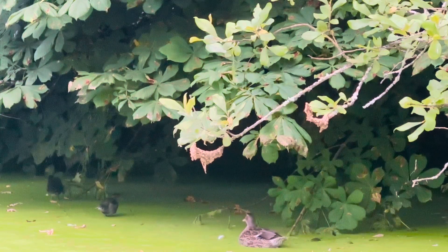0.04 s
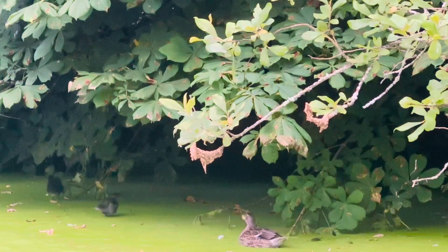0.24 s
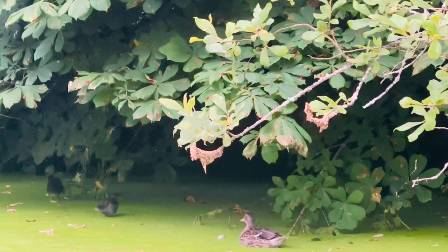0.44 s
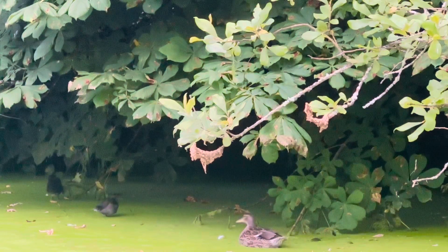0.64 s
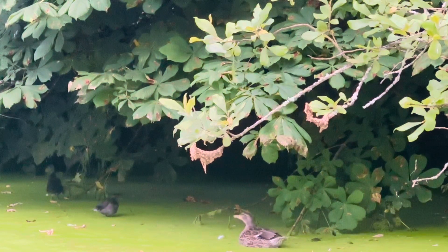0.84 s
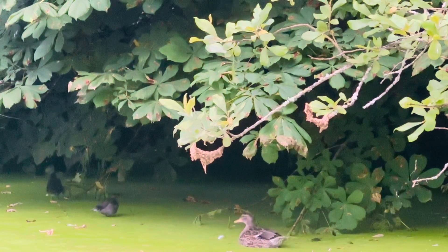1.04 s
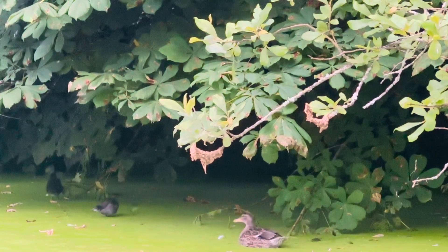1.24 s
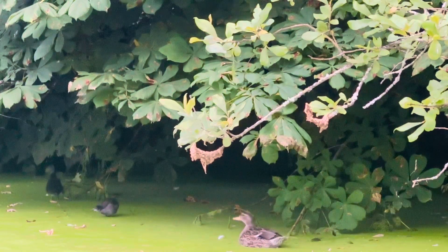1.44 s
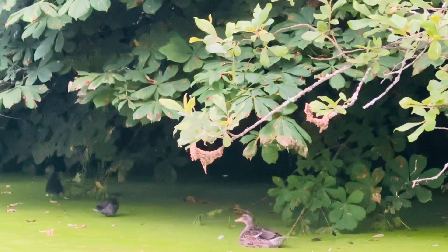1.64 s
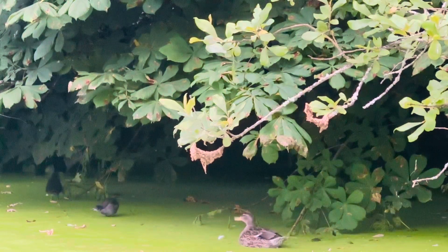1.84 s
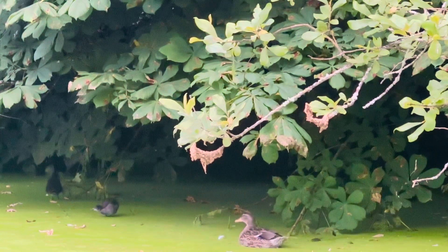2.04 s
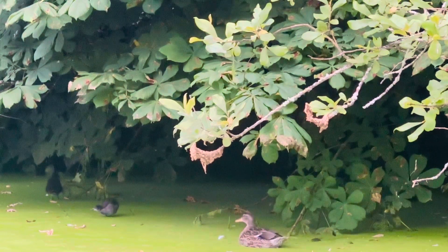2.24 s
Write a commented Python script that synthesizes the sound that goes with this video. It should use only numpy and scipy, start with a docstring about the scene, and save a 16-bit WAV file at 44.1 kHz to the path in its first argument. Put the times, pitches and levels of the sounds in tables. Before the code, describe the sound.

A duck gives two short, falling peeps on a quiet pond over a faint low rumble.

```python
"""A faint, steady low rumble and a soft hiss of leaves hang over a quiet pond.
A duck gives two short peeps, each opening with a rasp and sliding down in pitch: a tone shaped
by its throat and bill. The water mirrors the peeps, the bank echoes them and they die away
under the trees. Small splashes, ticks and rustles come off the water, and later a few
thin whistles sound faintly."""
import sys
import numpy as np
from scipy import signal
from scipy.fft import rfft, irfft
from scipy.io import wavfile

SR = 44100
rng = np.random.default_rng(int(sys.argv[2]) if len(sys.argv) > 2 else 0)


def unload_wav(signal):
    """Save mono or channel-first audio to the path in sys.argv[1] as 16-bit WAV at rate SR, clipped to [-1, 1]."""
    wavfile.write(
        sys.argv[1],
        SR,
        np.round(np.clip(np.atleast_2d(signal).T, -1, 1) * 32767).astype(np.int16),
    )


N = 101429
TIME = np.arange(N) / SR
FREQS = np.fft.rfftfreq(N, 1 / SR)


def from_db(db):
    """Turn decibels into a number to multiply a sound by."""
    return 10 ** (np.asarray(db) / 20)


def unit_level(x):
    """Scale a sound to an average (rms) level of 1."""
    return x / np.sqrt(np.mean(x ** 2) + 1e-20)


def over_time(rows):
    """Join a table's points with lines: one curve for each column after the time."""
    times, *columns = np.transpose(rows)
    return [np.interp(TIME, times, column) for column in columns]


def gain_at(colour, hz):
    """How strong a colour (a table of levels from low to high) is at these frequencies."""
    points_hz, db = np.transpose(colour)
    return from_db(np.interp(np.log(np.maximum(hz, 1)), np.log(points_hz), db))


def shaped_noise(gains):
    """Noise with each frequency turned up or down by its gain, at level 1."""
    return unit_level(irfft(rfft(rng.standard_normal(N)) * gains, N))


def noise(colour):
    """Noise of a given colour."""
    return shaped_noise(gain_at(colour, FREQS))


def noise_band(hz, octaves):
    """Noise that is strongest at one frequency and fades to either side."""
    away = np.log2(np.maximum(FREQS, 1) / hz) / octaves
    return shaped_noise(np.exp(-away ** 2 / 2))


def drift(rate_hz):
    """A smooth random wobble; a higher rate wobbles faster."""
    return shaped_noise(1 / (1 + (FREQS / rate_hz) ** 2))


def burst(at_s, rise_s, fall_s):
    """A loudness curve that swells to 1 at the given time and dies away."""
    return np.exp(-np.maximum((at_s - TIME) / rise_s, (TIME - at_s) / fall_s))


def delayed(x, lag_s):
    """The same sound, arriving later."""
    return np.interp(TIME - lag_s, TIME, x, left=0)


def stereo(mid, side):
    """Left and right, from the part they share (mid) and the part that sets them apart (side)."""
    return np.array([mid + side, mid - side])


# Colour of the rumble's shared part and of its side part: (frequency [Hz], level [dB])
RUMBLE_COLOUR = [(15, -34), (24, -32), (35, -15), (55, -0.5), (85, 1), (135, -6.5), (185, -3), (270, -13),
                 (450, -19.5), (750, -26.5), (1300, -36), (3000, -59.5)]
RUMBLE_SIDE_COLOUR = [(15, -26), (35, -7), (65, 1.5), (130, -3), (185, 5.5), (300, -8.5), (600, -8.5),
                      (1000, -15), (1600, -44), (3000, -72)]
# Loudness of the shared part: (time [s], level [dB])
RUMBLE_LEVEL = [(0, -54.5), (.7, -55.5), (1.2, -57), (1.6, -57), (2.3, -57)]

def rumble():
    """A low, nearly steady rumble from far away."""
    mid = from_db(over_time(RUMBLE_LEVEL)[0]) * noise(RUMBLE_COLOUR)
    side = from_db(-67.5) * noise(RUMBLE_SIDE_COLOUR)
    return stereo(mid, side)


# Colour of the leaves' hiss and of a higher hiss above it: (frequency [Hz], level [dB])
LEAF_COLOUR = [(300, -9), (1300, 4.5), (2200, 1.5), (4200, -2), (5000, -11.5), (7000, -19.5), (9000, -8.5),
               (11500, -15.5), (14500, -12), (16000, -33)]
HIGH_HISS_COLOUR = [(3000, -9), (5000, 1), (7000, 0.5), (9500, -0.5), (11500, -11.5), (15000, -14)]
# Loudness of each: (time [s], level [dB])
LEAF_LEVEL = [(0, -78.5), (.55, -74.5), (.73, -79), (.88, -77.5), (1.1, -78.5), (1.3, -74.5), (1.55, -73.5),
              (1.7, -78), (2.05, -78), (2.3, -76)]
HIGH_HISS_LEVEL = [(0, -82), (.17, -86), (.4, -78.5), (.6, -80), (.75, -86), (.9, -80.5), (1.12, -83.5),
                   (1.3, -78), (1.55, -78), (1.68, -95), (1.95, -90.5), (2.3, -91.5)]

def leaves(flicker_db=2):
    """Leaves hiss softly, in two layers that each flicker in loudness."""
    hiss = stereo(noise(LEAF_COLOUR), from_db(-26) * noise(LEAF_COLOUR))
    hiss_db = over_time(LEAF_LEVEL)[0] + flicker_db * drift(rate_hz=64)
    high_db = over_time(HIGH_HISS_LEVEL)[0] + flicker_db * drift(rate_hz=54)
    return hiss * from_db(hiss_db) + noise(HIGH_HISS_COLOUR) * from_db(high_db)


# The rasp before each peep: (time [s], level [dB])
RASPS = [(0.214, -48.5), (1.348, -45.5)]
# Its colour: (frequency [Hz], level [dB])
RASP_COLOUR = [(200, -9.5), (550, 0), (800, -9), (1350, 1.5), (1800, -15), (3000, -36), (6000, -31.5),
               (15000, -47)]

def rasps():
    """A brief, rough puff of noise as the duck's bill opens."""
    loudness = sum(from_db(db) * burst(s, rise_s=0.0036, fall_s=0.0081) for s, db in RASPS)
    return noise(RASP_COLOUR) * loudness


# The course of each peep, before the throat shapes it: (time [s], pitch [Hz], level [dB])
FIRST_PEEP = [(0.2175, 1281, -64), (0.2193, 1283, -36), (0.225, 1168, -30.5), (0.231, 1098, -30),
              (0.237, 1019, -29.5), (0.248, 965.6, -36), (0.251, 962, -44), (0.258, 1040, -61)]
SECOND_PEEP = [(1.35, 1361, -54), (1.3521, 1343, -32.5), (1.354, 1370, -55), (1.359, 1118, -31),
               (1.365, 1045, -30), (1.371, 978, -31.5), (1.38, 912, -41.5), (1.387, 856, -59.5)]
# How the throat and bill boost or weaken the tone: (frequency [Hz], gain [dB])
THROAT = [(880, -7), (1200, -0.5), (1550, 12), (1900, -1.5), (2150, -7.5), (2500, -10), (2700, -16),
          (2920, -9.5), (3350, -25.5), (3750, -32.5), (4400, -27), (5000, -23), (5500, -30.5), (6100, -45),
          (7500, -54), (8500, -37), (10000, -52), (15000, -69)]
# Colour of the breath, one list for each peep: (frequency [Hz], level [dB])
BREATH_COLOURS = [
    [(500, -14), (1400, 7.5), (3000, 3.5), (4800, -7), (6300, -17), (7500, 3), (8500, 6), (9400, -12),
     (11500, -32), (15500, -16)],
    [(500, -12), (1400, 0), (3000, 9), (4800, 2), (6300, -4), (8500, -10), (10500, -3.5), (13000, -2),
     (15500, -13)],
]
# One row for each peep: (delay off the water [s], strength off the water [0-1], breath level [dB])
REFLECTION_AND_BREATH = [(.00573, 0.45, -26.5), (.00534, 0.52, -32.5)]

def peeps(pitch_wobble=0.0117, level_wobble_db=0.5, wobble_hz=560):
    """A shaky, breathy tone slides down through the duck's throat and mixes with its reflection."""
    sound = np.zeros(N)
    calls = zip((FIRST_PEEP, SECOND_PEEP), BREATH_COLOURS, REFLECTION_AND_BREATH)
    for course, breath_colour, (lag_s, reflection, breath_db) in calls:
        hz, db = over_time(course)
        hz = hz * (1 + pitch_wobble * drift(wobble_hz))
        phase = 2 * np.pi * np.cumsum(hz) / SR
        # The tone is 12 pure waves, at whole multiples of the pitch.
        tone = sum(gain_at(THROAT, k * hz) * np.sin(k * phase) for k in range(1, 13))
        puffs = 1 + np.cos(phase)  # one puff of breath for each vibration
        breath = from_db(breath_db) * noise(breath_colour) * puffs
        loudness = from_db(db + level_wobble_db * drift(wobble_hz))
        sounding = (TIME > course[0][0]) & (TIME < course[-1][0])
        voice = (tone + breath) * loudness * sounding
        sound += voice + reflection * delayed(voice, lag_s)
    return sound


# Sound lingering under the trees: (frequency [Hz], relative level [dB], time to fade by 60 dB [s])
TREE_BANDS = [(496, -1.5, 0.96), (1070, -1, 0.44), (2120, -1.5, 0.53), (3130, 1.5, 0.39), (4750, 5.5, 0.36),
              (8500, 9.5, 0.18), (14100, 10, 0.52)]

def trees(x, level_db=-10.5, build_s=0.0025, side_db=-7):
    """Sound scatters off leaves and branches, and each band of frequencies fades at its own speed."""
    t = TIME[:SR]
    log_hz = np.log(np.fft.rfftfreq(SR, 1 / SR) + 1)
    log_centres = np.log([row[0] for row in TREE_BANDS])
    white = rfft(rng.standard_normal((2, SR)))
    tails = 0  # what the trees send back from one click, as mid and side
    for this_band, (_, db, fade_s) in zip(np.eye(len(TREE_BANDS)), TREE_BANDS):
        band = irfft(white * np.interp(log_hz, log_centres, this_band), SR)
        fade = from_db(-60 * t / fade_s) * (1 - np.exp(-t / build_s))
        tails += from_db(level_db + db) * band * fade / np.linalg.norm(fade)
    mid, side = (signal.fftconvolve(x, tail)[:N] for tail in tails)
    return stereo(mid, from_db(side_db) * side)


# Echoes off the bank: (delay [s], level [dB], left louder than right by [dB])
BANK_ECHOES = [(.031, -31.5, 1), (.052, -24, 3), (.071, -12.5, 1)]

def bank_echoes(x, dull_above_hz=1300, smear_s=0.0034, scatter=0.45):
    """The overgrown bank sends back a few dull, partly smeared echoes."""
    dull = signal.sosfilt(signal.butter(1, dull_above_hz, fs=SR, output="sos"), x + 1e-18)
    smear = rng.standard_normal(SR // 10) * np.exp(-TIME[:SR // 10] / smear_s)
    smeared = signal.fftconvolve(dull, smear / np.linalg.norm(smear))[:N]
    echo = np.sqrt(1 - scatter ** 2) * dull + scatter * smeared
    return sum(from_db([[db + pan / 2], [db - pan / 2]]) * delayed(echo, s) for s, db, pan in BANK_ECHOES)


# Small splashes: (time [s], level [dB], centre frequency [Hz], width [octaves], fade time [s])
SPLASHES = [(.354, -63, 6250, .2, .002), (0.536, -61, 1490, 0.36, 0.0059), (.55, -64, 1570, .5, 0.0042),
            (0.579, -64, 2480, 0.82, 0.0032), (0.797, -68, 890, 0.74, 0.0038),
            (.818, -64.5, 5300, 0.16, 0.004), (1.014, -74.5, 2530, 0.35, 0.013),
            (1.56, -63, 2500, 0.55, 0.0037), (1.622, -63, 1630, 0.77, 0.0096),
            (1.627, -63.5, 2440, 0.43, 0.005), (1.636, -59, 4650, 0.12, 0.0017),
            (1.679, -66.5, 5840, 0.092, 0.0036), (1.742, -61, 1920, 0.11, .004),
            (1.745, -59, 2940, 0.31, 0.0044), (1.751, -64, 4060, 0.66, 0.0025),
            (1.908, -56.5, 1257, 0.15, 0.0031), (1.966, -69.5, 1570, 0.38, 0.0093),
            (1.985, -66, 2770, 0.37, 0.0055), (2.05, -71.5, 1950, 0.18, 0.0048),
            (2.092, -66, 920, 0.15, 0.0036), (2.146, -69, 2300, 0.24, 0.005),
            (2.153, -63, 1300, 0.15, 0.0058), (2.188, -64, 1860, 0.17, 0.0039),
            (2.275, -68, 1330, 0.32, .007)]

def splashes(rise_s=0.00058):
    """Dabbling in the water: each splash is a short spatter with a colour of its own."""
    return sum(from_db(db) * noise_band(hz, octaves) * burst(s, rise_s, fall_s)
               for s, db, hz, octaves, fall_s in SPLASHES)


# Tiny dry ticks: (time [s], level [dB])
TICKS = [(0.377, -60), (0.578, -62), (0.64, -58.5), (0.874, -60.5), (1.487, -71), (1.829, -67),
         (1.997, -63), (2.121, -58)]
# Their colour: (frequency [Hz], level [dB])
TICK_COLOUR = [(1000, 5), (4000, -3), (6500, -17), (9000, 7), (12000, -2.5), (15500, -5)]

def ticks():
    """Very short, bright snaps of noise."""
    loudness = sum(from_db(db) * burst(s, rise_s=0.0003, fall_s=0.0011) for s, db in TICKS)
    return noise(TICK_COLOUR) * loudness


# High rustles: (time [s], level [dB], centre frequency [Hz], width [octaves], fade time [s])
RUSTLES = [(.585, -82, 10200, .3, 0.062), (.84, -75, 5160, 0.45, 0.037), (1.24, -73.5, 7400, .5, 0.036),
           (1.29, -74, 5400, 0.51, .04), (1.42, -70, 5040, 0.4, 0.1), (1.566, -75, 10900, 0.14, 0.012),
           (1.7, -78.5, 5430, 0.32, 0.14), (1.868, -79, 7600, 0.11, 0.06), (2.015, -79, 10500, 0.35, 0.072),
           (2.19, -84, 10500, 0.22, 0.052), (2.29, -78, 9600, 0.14, .03)]

def rustles(rise_s=0.015, grain_db=2.5):
    """Water and leaves rustle in soft swells; a fast flicker makes them grainy."""
    swells = sum(from_db(db) * noise_band(hz, octaves) * burst(s, rise_s, fall_s)
                 for s, db, hz, octaves, fall_s in RUSTLES)
    return swells * from_db(grain_db * drift(rate_hz=270))


# Faint whistles: (time [s], level [dB], pitch [Hz], fade time [s])
WHISTLES = [(1.278, -73.5, 4540, 0.055), (1.451, -63.5, 4500, 0.013), (2.27, -82, 4420, .03)]

def whistles(rise_s=0.0033):
    """Thin whistles, perhaps a far bird: noise so narrow that it sounds like a wavering note."""
    return sum(from_db(db) * noise_band(hz, octaves=0.016) * burst(s, rise_s, fall_s)
               for s, db, hz, fall_s in WHISTLES)


def scene():
    """The whole pond; only the duck, the splashes and the ticks echo."""
    near = rasps() + peeps() + splashes() + ticks()
    return rumble() + leaves() + near + trees(near) + bank_echoes(near) + rustles() + whistles()


def record(dry, flip_hz=8276, width_hz=1490, edge_hz=400, cutoff_hz=15700):
    """The right microphone turns the wave upside down in one high band; the very top is cut off."""
    inside_hz = width_hz / 2 - np.abs(FREQS - flip_hz)
    flip = np.clip(0.5 + inside_hz / edge_hz, 0, 1)  # 0 outside the band, 1 inside
    right = irfft(rfft(dry[1]) * np.exp(1j * np.pi * flip), N)
    top_cut = signal.ellip(10, 0.1, 70, cutoff_hz, fs=SR, output="sos")
    return signal.sosfilt(top_cut, [dry[0], right])


dry = scene()
out = record(dry)
unload_wav(out)
```